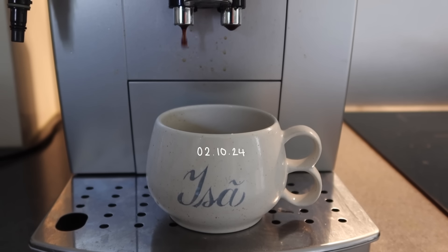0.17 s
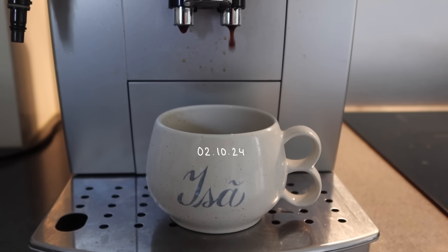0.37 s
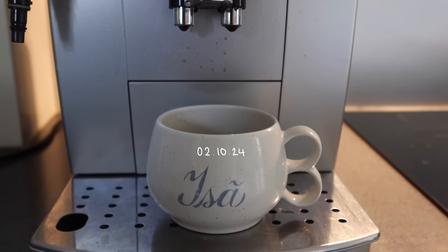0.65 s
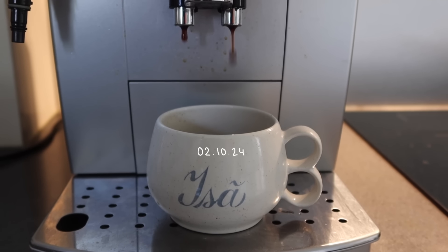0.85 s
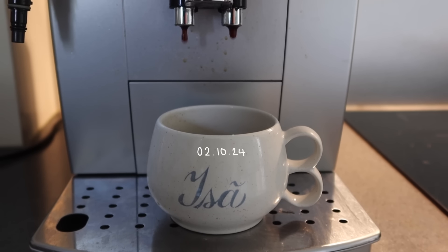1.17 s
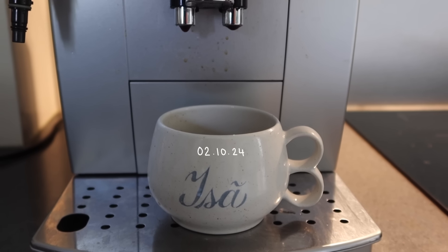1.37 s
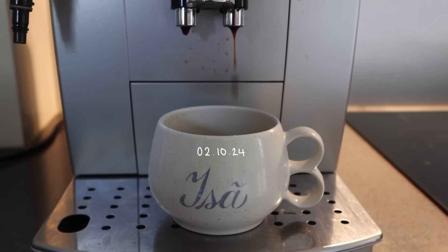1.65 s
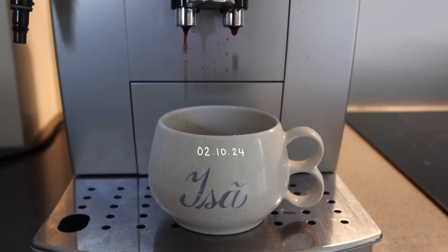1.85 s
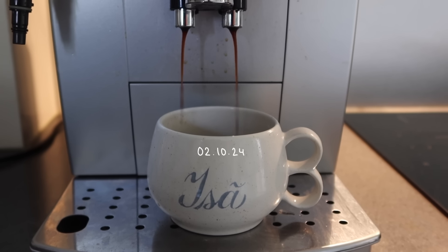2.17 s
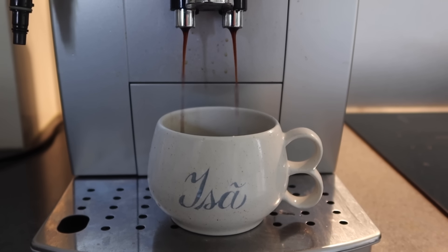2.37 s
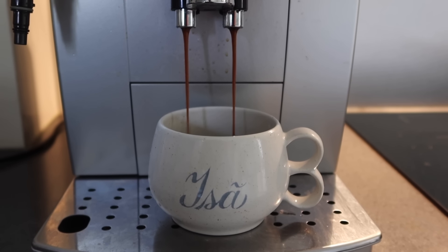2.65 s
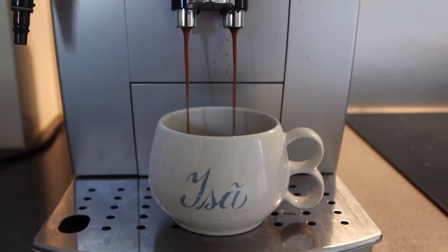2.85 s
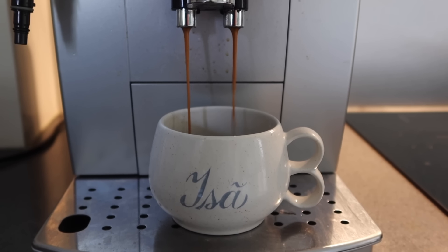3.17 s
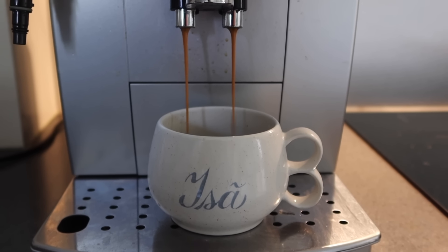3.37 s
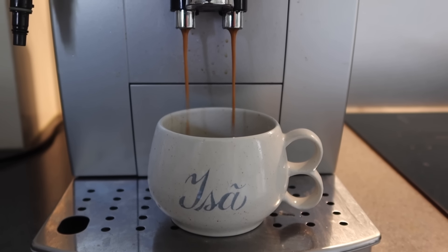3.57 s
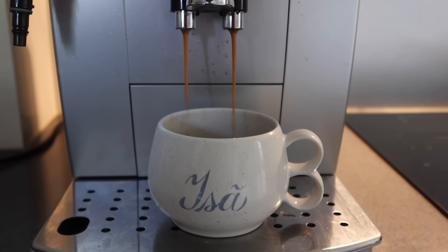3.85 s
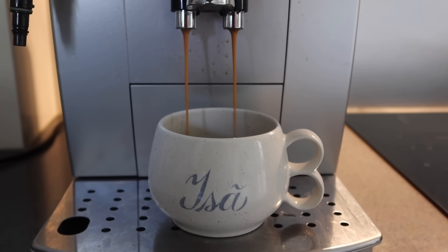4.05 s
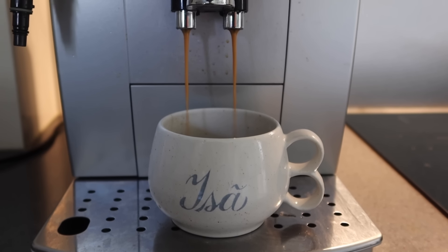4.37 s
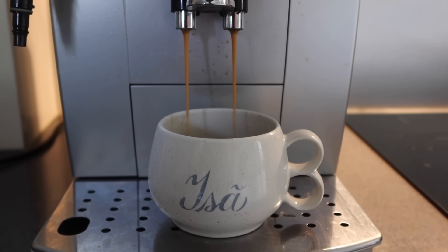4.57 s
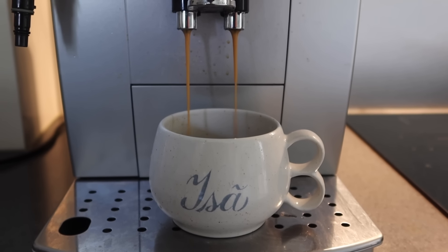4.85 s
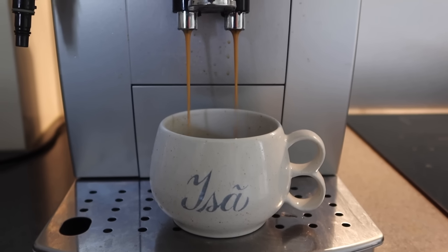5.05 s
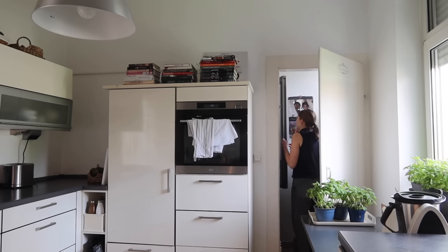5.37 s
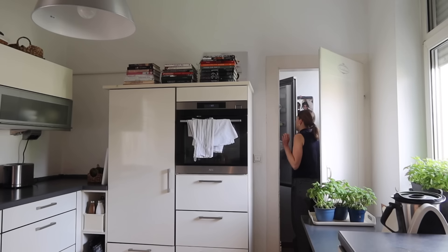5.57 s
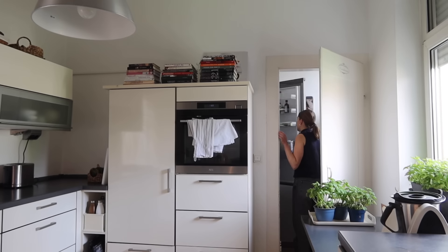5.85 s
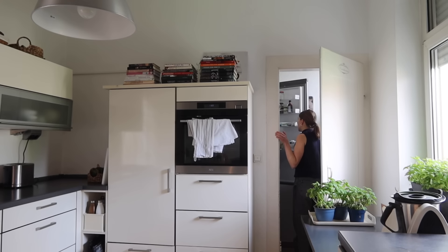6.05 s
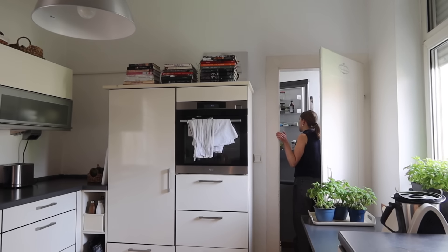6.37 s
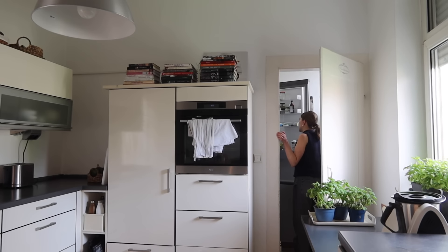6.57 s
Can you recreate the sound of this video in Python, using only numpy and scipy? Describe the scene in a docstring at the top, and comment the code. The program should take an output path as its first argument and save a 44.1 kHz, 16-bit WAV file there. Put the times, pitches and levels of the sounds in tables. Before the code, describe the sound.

An automatic coffee machine clicks, lurches with a short gear whirr, then its pump buzzes steadily while coffee patters and bubbles into a mug.

```python
"""Automatic coffee machine close by in a quiet kitchen, over air noise and a faint hum.
A click (noise through decaying resonances); the brew drive lurches (gear tones, shaped noise, struck modes).
Relay clicks; the vibration pump buzzes on mains harmonics, rattles once a stroke, firms up under pressure.
Coffee patters (random splash bursts) and bubbles (short rising sines) into a mug.
The pump stops with a click and a shudder; soft bumps follow in the next room (struck wooden modes)."""
import sys
import numpy as np
from scipy import signal
from scipy.fft import rfft, irfft, next_fast_len
from scipy.io import wavfile

SR = 44100
rng = np.random.default_rng(int(sys.argv[2]) if len(sys.argv) > 2 else 0)


def wrap_up_sound(samples):
    """Save the sound to the file named by the first command line argument, as 16-bit audio."""
    columns = np.atleast_2d(samples).T
    # keep every value between -1 and 1, then stretch to whole-number steps
    tamed = np.clip(columns, -1, 1)
    steps = np.round(tamed * 32767).astype(np.int16)
    wavfile.write(sys.argv[1], SR, steps)


N = 295514
TIME = np.arange(N) / SR  # s

MAINS_HZ = 50.028
PUMP_ON_S, PUMP_OFF_S = 1.152, 5.164
PRESSURE_MID_S, PRESSURE_RISE_S = 1.79, 0.075  # S-curve: midpoint, time constant
DRIVE_ON_S, SPIN_UP_S, DRIVE_OFF_S = 0.526, 0.092, 0.62
WHINE_START_HZ, WHINE_TOP_HZ, COAST_HZ_PER_S = 380, 1105, 2800
STREAM_S, POOL_S = 2.37, 2.9  # coffee lands; pool deep enough to trap air
BUBBLE_HZ, BIG_BUBBLE_HZ, BIG_SHARE = 2666, 1378, 0.36  # two bubble sizes
FLOOR_DB = -51.5
EDGE_HZ = 15800

# pump hum, running free and at full pressure: multiple of mains, relative level/dB
HUM_FREE = [(1, -12), (2, -4), (3, -6.5), (4, 1.5), (5, -1), (6, -9.5), (7, -15), (8, 0.5), (9, -16),
            (10, -11), (11, -16), (12, -9.5)]
HUM_LOADED = [(1, -12.5), (2, -6), (3, -11), (4, -5), (5, -1), (6, -4), (7, -10.5), (8, 0), (9, -11.5),
              (10, -5), (11, -16.5), (12, -17.5), (13, -16.5), (14, -40), (15, -28.5), (16, -16), (17, -24),
              (18, -14), (19, -21)]
# rattling housing: f/Hz, density/dB per Hz
HOUSING = [(60, -27), (170, 7), (280, 18), (450, 8.5), (700, 11), (1100, 5), (1600, -2), (2400, -2.5),
           (3300, -3.5), (3800, -9.5), (5200, -15), (6200, -24.5), (10000, -30.5), (15000, -47)]
# its panel resonances: f/Hz, width/Hz, height/dB
PANELS = [(1376, 91, 3.3), (1570, 170, 5.5), (2005, 35, 6), (2550, 43, 1.5), (3009, 76, 8.2),
          (3383, 33, 10.6), (4360, 160, 8)]
# case shudder at pump start and stop: t/s, level/dB
SHUDDERS = [(1.153, -25.5), (5.162, -30)]
# case modes: f/Hz, level/dB, t60/s
CASE_MODES = [(105.7, -1.5, 0.31), (210, -10, 0.24), (311.5, -1, 0.13), (540, -15, 0.7)]
# gear tones: multiple of the whine, level/dB
GEARS = [(1, -2.5), (1.562, -11), (2.329, -22)]
# gear grind: f/Hz, density/dB per Hz
GRIND = [(30, -35), (55, -22), (90, 3), (150, -31), (210, 6), (300, -2), (420, -6), (700, -0.5),
         (1200, -10.5), (1800, -17.5), (2700, -23.5), (3800, -32), (6000, -36.5), (10000, -47),
         (15000, -59)]
# gearbox resonances: f/Hz, width/Hz, height/dB
GEARBOX = [(506, 33, 9), (618, 45, 4.5), (2150, 90, 7.5), (2500, 53, 4)]
# brew unit knocks: t/s, level/dB
KNOCKS = [(.529, -20), (.561, -10), (.575, -13), (.652, -22.5)]
# frame modes: f/Hz, level/dB, t60/s
FRAME_MODES = [(207, -7, 0.154), (401, 1.5, 0.082), (506, -9, 0.2), (596, -18, 0.11), (720, -29, 0.13)]
# switch and valve clicks: t/s, level/dB, ring t60/s, tilt/dB per octave
CLICKS = [(0.04, -31, 0.18, 1), (1.119, -32, 0.16, -2.5), (1.148, -30, 0.086, -2.5),
          (1.153, -27, 0.025, -4), (5.1605, -36, 0.012, -1)]
# click spectrum: f/Hz, density/dB per Hz
CLICK_COLOUR = [(150, -13), (500, -2.5), (850, 4), (1300, -3.5), (1750, -7), (2200, -1.5), (2800, -6),
                (4500, -14.5), (6500, -14.5), (8000, -11), (10000, -20), (15000, -31)]
# largest drops in the mug: t/s, level before trim/dB, strongest f/Hz
SPATTER = [(2.5825, -23, 5100), (2.795, -34, 6920), (3.0027, -31.5, 5340), (3.2229, -33, 4960),
           (3.7085, -30, 5840), (4.0524, -35, 7120), (4.2833, -34, 4550), (4.3257, -31.5, 4520),
           (4.5191, -33, 4520), (4.6364, -26.5, 4540), (4.7326, -35, 4940), (5.0772, -24.5, 4860)]
# splash spectrum: f/Hz, density/dB per Hz
SPLASH = [(1200, 9), (2700, -7), (4500, 6.5), (6000, -1.5), (7050, 8), (7700, -4.5), (9500, 1.5),
          (12000, -13), (15500, -20)]
# largest bubbles in the mug: t/s, level before trim/dB, f/Hz
BUBBLES = [(2.9572, -20, 2700), (3.022, -27, 2680), (3.126, -27, 2710), (3.3568, -24, 2680),
           (3.5948, -23, 2690), (3.793, -20, 2720), (3.8435, -25, 2690), (4.114, -20.5, 1380),
           (4.2842, -21.5, 2660), (4.3153, -22.5, 1410), (4.5206, -15.5, 2650), (4.8316, -21, 2660)]
# bumps in the next room: t/s, level/dB
BUMPS = [(5.70, -49.5), (5.726, -45.5), (5.794, -44), (5.822, -48)]
# wooden modes: f/Hz, level/dB, t60/s
WOOD_MODES = [(130, -5, 0.17), (252, -6, 0.11), (329, -1, 0.23), (400, -11, .15), (584, -3.5, 0.1),
              (1320, -15, .1)]
# air noise: f/Hz, density/dB per Hz
FLOOR = [(12, -39), (20, -8), (43, -20), (53, -3.5), (107, -7), (216, -12), (255, -11.5), (527, -17.5),
         (574, -20), (1030, -19.5), (1260, -22), (1860, -23), (6720, -33), (14300, -48), (16000, -54)]
# air noise width: f/Hz, side over mid/dB
FLOOR_SIDE = [(40, -22), (85, -23), (170, -8.5), (340, 3.5), (1300, -0.5), (2700, -3), (10000, -5)]
# width of machine and echoes: f/Hz, side over mid/dB
SIDE = [(60, -61), (200, -67), (380, -30.5), (700, -16.5), (1290, -34.5), (2380, -11.5), (4400, -6.5),
        (8120, -0.5), (15000, 8)]
# channel balance: f/Hz, left over right/dB
LEAN = [(200, 0), (380, -.5), (700, -2.3), (1290, .4), (2400, 1), (4400, 1), (8000, 0)]
# kitchen decay: f/Hz, t60/s
KITCHEN_T60 = [(100, 0.62), (500, 0.51), (1200, 0.59), (2500, 0.37), (5000, 0.4), (12000, 0.26)]
# echo spectrum: f/Hz, gain/dB
ECHO_COLOUR = [(100, -4), (300, -6), (600, 1.5), (1300, -1.5), (2200, -1), (3500, -4), (8000, 2.5)]


def pump_hum(free_db=-28.5, loaded_db=-25.0, waver_db=1.5, build_s=0.00047, strain_hz=300,
             strain_width_hz=35, strain_db=3.5, strain_lag_s=0.2, treble_hz=750, treble_lag_s=0.23):
    """Piston shakes the case at mains multiples; pressure hardens the stroke, one panel swells under strain."""
    dispersion = 0.09  # bending waves travel faster at high pitch, smearing each stroke over its cycle
    free = {round(k): amp(db) for k, db in HUM_FREE}
    loaded = {round(k): amp(db) for k, db in HUM_LOADED}
    free_gain = amp(free_db) * np.sqrt(2) / np.linalg.norm(list(free.values()))
    loaded_gain = amp(loaded_db) * np.sqrt(2) / np.linalg.norm(list(loaded.values()))
    # peaks late in the climb, strain_lag_s after its midpoint
    strain = np.sin(np.pi * pressure(TIME - strain_lag_s))
    cycles = MAINS_HZ * (TIME - PUMP_ON_S) + 0.5
    out = np.zeros(N)
    for k in loaded:
        hz = k * MAINS_HZ
        load = pressure(TIME - treble_lag_s * (hz > treble_hz))  # highest partials harden later
        size = (1 - load) * free_gain * free.get(k, 0) + load * loaded_gain * loaded[k]
        swell_db = strain_db * strain / (1 + (2 * (hz - strain_hz) / strain_width_hz) ** 2)
        unsteady_db = waver_db * np.sqrt(k / 4) * (1 - 0.92 * load) * drift(17)
        # upper partials settle in more slowly
        build = 1 - np.exp(-np.maximum(TIME - PUMP_ON_S, 0) / (build_s * k ** 2))
        wave = np.cos(2 * np.pi * (k * cycles + dispersion * k ** 2))
        out += size * amp(swell_db + unsteady_db) * build * wave
    return out * between(PUMP_ON_S, PUMP_OFF_S + 0.00092)


def pressure(t):
    """Water pressure behind the coffee, 0 (running free) to 1."""
    return 0.5 + 0.5 * np.tanh((t - PRESSURE_MID_S) / (2 * PRESSURE_RISE_S))


def pump_rattle(count=4, loose=0.35, tight=0.26, jitter_ms=0.11, hiss_db=-7, loose_db=-38.5,
                tight_db=-40.5, ring_t60_s=0.02, weaker_db=1.65):
    """Loose parts chatter at each stroke, a little quieter and steadier under pressure; valve water hisses."""
    strokes = np.arange(PUMP_ON_S, PUMP_OFF_S, 1 / MAINS_HZ)
    slack = loose + (tight - loose) * pressure(strokes)
    chatter = np.zeros(N)
    for part in range(count):
        force, late = rng.standard_normal((len(strokes), 2)).T
        # parts answer in turn, each weaker, with a short rest before the next stroke
        lag_s = part / (count + 1) / MAINS_HZ
        at_s = strokes + lag_s + late * jitter_ms / 1000 * slack / tight
        hits = np.bincount(np.round(at_s * SR).astype(int), 1 + slack * force, N)
        chatter += amp(-weaker_db * part) * signal.oaconvolve(hits, scatter(ring_t60_s))[:N]
    small_parts = signal.butter(4, 1400, "high", fs=SR, output="sos")  # too small for bass
    chatter = signal.sosfilt(small_parts, chatter)
    gate = between(PUMP_ON_S, PUMP_OFF_S)
    phase = (TIME - PUMP_ON_S) * MAINS_HZ % 1
    hiss = rng.standard_normal(N) * (1.5 + np.exp(-phase / 0.51))
    drive = evened(chatter * gate) + amp(hiss_db) * evened(hiss * gate)
    sound = colour(drive, HOUSING, PANELS)
    # levels refer to the 1-6 kHz band
    band = signal.butter(4, [1000, 6000], "band", fs=SR, output="sos")
    treble = signal.sosfilt(band, sound)
    level_db = loose_db + (tight_db - loose_db) * pressure(TIME)
    return sound / np.std(treble[gate > 0]) * amp(level_db)


def scatter(t60_s):
    """Click smeared in time by many small rings, equally strong at every pitch."""
    z = rfft(burst([(20, 0), (20000, 0)], t60_s))
    return irfft(z / abs(z))[:4096]


def case_buzz(buzz_hz=426, buzz_db=-44):
    """Loose panel buzzes unsteadily between two mains multiples."""
    sway = 0.5 * drift(27)
    wander_rad = 0.65 * drift(21)
    tone = np.sin(2 * np.pi * buzz_hz * TIME + wander_rad)
    return amp(buzz_db) * (1 + sway) * tone * between(PUMP_ON_S, PUMP_OFF_S)


def case_shudder():
    """Pump start and stop each strike the case modes."""
    return strike(SHUDDERS, CASE_MODES)


def brew_drive(thrum_hz=102, teeth=0.11, thrum_db=-19, thrum_attack_s=0.047, thrum_fall_db_per_s=140,
               grind_db=-22.5, grind_attack_s=0.023, overrun_s=0.026, grind_fall_db_per_s=290,
               rasp_db=-29, rasp_tilt_db_per_oct=1.5, rasp_s=0.019):
    """Gears whine, grind and rasp, the winding thrums, the frame knocks; returns tones and clatter."""
    mesh = 1 + teeth * np.cos(2 * np.pi * thrum_hz * TIME)
    rubbing, scraping = rng.standard_normal((2, N)) * mesh
    grind_env = held(DRIVE_ON_S, grind_attack_s, DRIVE_OFF_S + overrun_s, grind_fall_db_per_s)
    grind = amp(grind_db) * grind_env * evened(colour(rubbing, GRIND, GEARBOX))
    rasp_env = np.exp(-((TIME - DRIVE_ON_S - SPIN_UP_S) / rasp_s) ** 2)  # centred on top speed
    rasp = amp(rasp_db) * rasp_env * evened(colour(scraping, GRIND, GEARBOX, rasp_tilt_db_per_oct))
    thrum_env = held(DRIVE_ON_S, thrum_attack_s, DRIVE_OFF_S, thrum_fall_db_per_s)
    thrum = amp(thrum_db) * thrum_env * np.sin(2 * np.pi * thrum_hz * TIME)
    return gear_whine() + thrum, grind + rasp + strike(KNOCKS, FRAME_MODES)


def gear_whine(whine_db=-26, top_db=12, top_s=0.01, fall_db_per_s=260, wander=0.012):
    """Gear pitch follows the motor up and as it coasts; the gears sing out briefly at top speed."""
    speed = np.sin(np.pi / 2 * np.clip((TIME - DRIVE_ON_S) / SPIN_UP_S, 0, 1))
    coast_hz = COAST_HZ_PER_S * np.maximum(TIME - DRIVE_OFF_S, 0)
    hz = np.maximum(WHINE_START_HZ + (WHINE_TOP_HZ - WHINE_START_HZ) * speed - coast_hz, 0)
    turns = np.cumsum(hz * (1 + wander * drift(300))) / SR
    top = np.exp(-((TIME - DRIVE_ON_S - SPIN_UP_S) / top_s) ** 2)
    level = amp(whine_db + top_db * top) * held(DRIVE_ON_S, 0.006, DRIVE_OFF_S, fall_db_per_s)
    return level * sum(amp(db) * np.sin(2 * np.pi * ratio * turns) for ratio, db in GEARS)


def clicks(ring_db=-6):
    """Relays and valves snap; the plastic case rings after them."""
    out = np.zeros(N)
    for s, db, t60_s, tilt_db in CLICKS:
        snap = burst(CLICK_COLOUR, 0.025, tilt_db)
        ring = burst(CLICK_COLOUR, t60_s, tilt_db)
        add(out, s, amp(db) * (snap + amp(ring_db) * ring))
    return out


def pour(trim_db=-1, ring_db=-13, drops_per_s=120, patter_db=-59, clump_db=4, landing_db=13,
         landing_s=0.04, small_db=-47, spread_db=8, count=20):
    """Coffee patters, loudest on first meeting the bare bottom; larger drops snap and the mug rings faintly."""
    drops = rng.random(N) < drops_per_s / SR
    size = amp(6 * np.minimum(rng.exponential(1, N), 4)) * drops
    landing = np.exp(-((TIME - STREAM_S) / landing_s) ** 2)
    flow_db = patter_db + clump_db * drift(9) + landing_db * landing
    patter = evened(signal.oaconvolve(size, burst(SPLASH, 0.012))[:N])
    out = patter * amp(flow_db) * between(STREAM_S - landing_s, PUMP_OFF_S)
    small = [(filling(STREAM_S, when), small_db + spread_db * loud, 4800 + 5000 * pitch)
             for when, loud, pitch in rng.random((count, 3))]
    for s, db, hz in list(SPATTER) + small:
        tone = [(hz, 1800, 7)]  # f/Hz, width/Hz, height/dB
        snap = burst(SPLASH, 0.008, peaks=tone)
        ring = burst(SPLASH, 0.05, peaks=tone)
        add(out, s, amp(db + trim_db) * (snap + amp(ring_db) * ring))
    return out


def bubbles(ring_t60_s=0.042, rise_per_s=2.15, ring_db=-1, pop_db=-10, small_db=-37.0, spread_db=9,
            size_spread=0.086, count=56):
    """Bubbles pop, ring briefly and rise a little in pitch; faint ones crowd in as the mug fills."""
    faint = []
    for when, loud, kind, size in rng.random((count, 4)):
        base_hz = BIG_BUBBLE_HZ if kind < BIG_SHARE else BUBBLE_HZ
        hz = base_hz * (1 + size_spread * (2 * size - 1))
        faint.append((filling(POOL_S, when), small_db + spread_db * loud, hz))
    t, out = TIME[:SR // 10], np.zeros(N)
    for s, db, hz in list(BUBBLES) + faint:
        swell = (1 - np.exp(-t / 0.0007)) * amp(db + ring_db - 60 * t / ring_t60_s)
        add(out, s, swell * np.sin(2 * np.pi * hz * (t + rise_per_s * t ** 2)))
        pop = burst([(hz / 2, -25), (hz, 0), (1.5 * hz, -1), (2.2 * hz, -25)], 0.014)
        add(out, s, amp(db + pop_db) * pop)
    return out


def filling(start_s, share):
    """Turns uniform chance into times that crowd together as the mug fills."""
    return start_s + (PUMP_OFF_S - start_s) * np.sqrt(share)


def next_room_bumps():
    """Soft blows ring wooden modes."""
    return strike(BUMPS, WOOD_MODES)


def kitchen(x):
    """Diffuse echoes, each band dying at its own speed."""
    taps = rng.standard_normal(SR) * (TIME[:SR] > 0.006)
    hz, t, z = signal.stft(taps, SR, nperseg=256)
    decay = amp(-60 * t / read(KITCHEN_T60, hz)[:, None])
    tail = signal.istft(z * decay, SR, nperseg=256)[1]
    return signal.fftconvolve(x, tail / np.linalg.norm(tail))[:N]


def room_tone(hum_hz=101, hum_db=-59):
    """Diffuse air noise, alike at both microphones only in the bass, and a wavering hum; returns mid, side."""
    one, other = (amp(FLOOR_DB) * evened(colour(rng.standard_normal(N), FLOOR)) for _ in range(2))
    hum = amp(hum_db) * (1 + 0.5 * drift(19)) * np.sin(2 * np.pi * hum_hz * TIME + drift(8.3))
    return one + hum, colour(other, FLOOR_SIDE)


def pair(x):
    """Two close microphones share the bass, left a little early; surfaces scatter the treble to each."""
    size = next_fast_len(N)
    hz = np.fft.rfftfreq(size, 1 / SR)
    delay_s = 0.0015 * (hz > 1300) * (1 + np.sin(hz / 170))
    phase = np.pi / 2 - 2 * np.pi * np.cumsum(delay_s) * hz[1]  # group delay summed over frequency
    scattered = irfft(rfft(x, size) * np.exp(1j * phase), size)[:N]
    side = colour(scattered, SIDE)
    left_lean = [(f, db / 2) for f, db in LEAN]
    right_lean = [(f, -db / 2) for f, db in LEAN]
    return np.array([colour(x, left_lean) + side, colour(x, right_lean) - side])


def strike(blows, modes):
    """Each blow rings the same modes, neighbours in opposite senses."""
    t, out = np.arange(SR // 2) / SR, np.zeros(N)
    ring = sum((-1) ** k * amp(db - 60 * t / t60_s) * np.sin(2 * np.pi * hz * t)
               for k, (hz, db, t60_s) in enumerate(modes))
    for s, db in blows:
        add(out, s, amp(db) * ring * (1 - np.exp(-t / 0.00067)))
    return out


def burst(points, t60_s, tilt_db=0, peaks=(), size=8192):
    """Dense cluster of dying resonances: coloured noise under an exponential decay."""
    noise = evened(colour(rng.standard_normal(size), points, peaks, tilt_db))
    return noise * amp(-60 * np.arange(size) / SR / t60_s)


def colour(x, points, peaks=(), tilt_db=0):
    """Filters by a spectrum, resonances standing on it, and a tilt per octave."""
    size = next_fast_len(len(x))
    hz = np.fft.rfftfreq(size, 1 / SR)
    db = read(points, hz) + tilt_db * np.log2(hz / SR + 1e-3)
    db = db + sum(height / (1 + (2 * (hz - f) / width) ** 2) for f, width, height in peaks)
    return irfft(rfft(x, size) * amp(db), size)[:len(x)]


def read(points, hz):
    """Interpolates a spectrum table on a log-frequency axis."""
    f, value = np.transpose(points)
    return np.interp(np.log(hz + 1), np.log(f + 1), value)


def drift(rate_hz):
    """Slow random wander: straight lines between unit-variance knots, rate_hz of them a second."""
    knots = np.arange(0, TIME[-1] + 1, 1 / rate_hz)
    return np.interp(TIME, knots, rng.standard_normal(size=4096)[:len(knots)])


def held(start_s, attack_s, stop_s, fall_db_per_s):
    """Envelope: straight attack, hold until stop, steady fall in dB."""
    attack = np.clip((TIME - start_s) / attack_s, 0, 1)
    return attack * amp(-fall_db_per_s * np.maximum(TIME - stop_s, 0))


def between(start_s, stop_s, edge_s=0.0055):
    """Gate with short ramps."""
    return np.clip((TIME - start_s) / edge_s, 0, 1) * np.clip((stop_s - TIME) / edge_s, 0, 1)


def add(mix, s, sound):
    """Mixes a sound in at time s."""
    part = mix[round(s * SR):][:len(sound)]
    part += sound[:len(part)]


def evened(x):
    """Scales to rms 1."""
    return x / np.sqrt(np.mean(x ** 2) + 1e-20)


def amp(db):
    """Decibels to gain."""
    return 10 ** (np.asarray(db) / 20)


def scene():
    """Machine and mug are near; the kitchen answers each by its own amount and widens the treble."""
    hum, rattle = pump_hum(), pump_rattle() + case_buzz()
    tones, clatter = brew_drive()
    snaps, patter, plinks = clicks(), pour(), bubbles()
    bumps = next_room_bumps()
    air, air_side = room_tone()

    # echo sends
    sent = amp(-16.5) * hum + amp(-3.5) * rattle
    sent += amp(-10) * tones + amp(-7.0) * clatter + amp(-8) * snaps
    sent += amp(-10.5) * (patter + plinks) + amp(-4.5) * bumps
    sent = colour(sent, ECHO_COLOUR)

    mid = kitchen(sent) + air + plinks  # bubbles straight ahead
    side = colour(kitchen(sent), SIDE) + air_side
    near = hum + rattle + tones + clatter + snaps + patter + case_shudder() + amp(-1) * bumps
    return pair(near) + np.array([mid + side, mid - side])


def record(dry):
    """Linear-phase low-pass at EDGE_HZ."""
    taps = signal.firwin(511, EDGE_HZ, window=("kaiser", 9), fs=SR)
    return signal.oaconvolve(dry, taps[None], "same")


dry = scene()
out = record(dry)
wrap_up_sound(out)
```